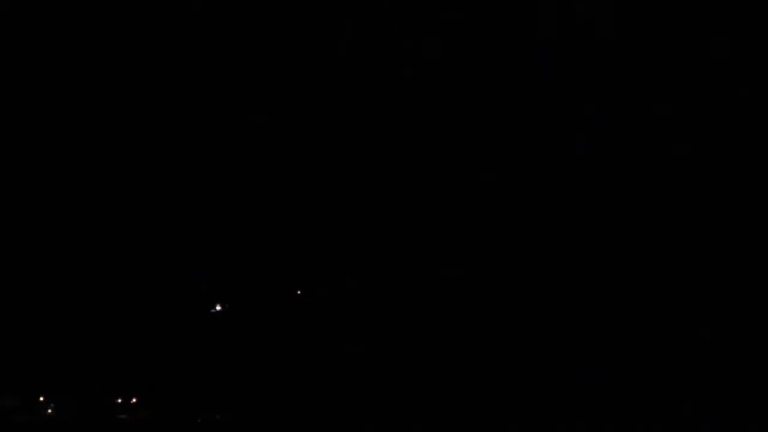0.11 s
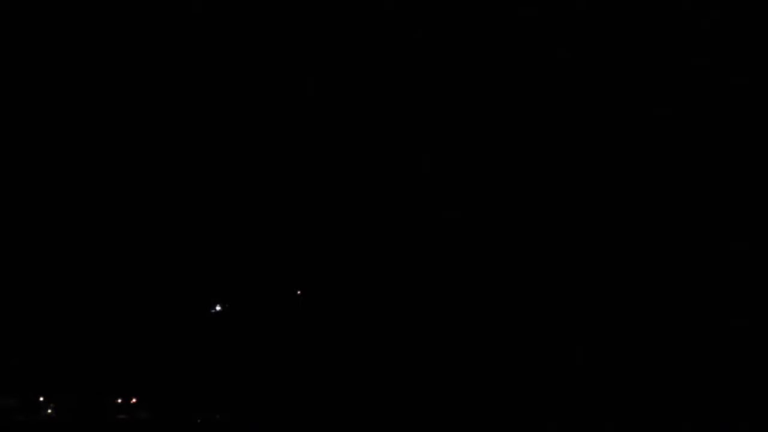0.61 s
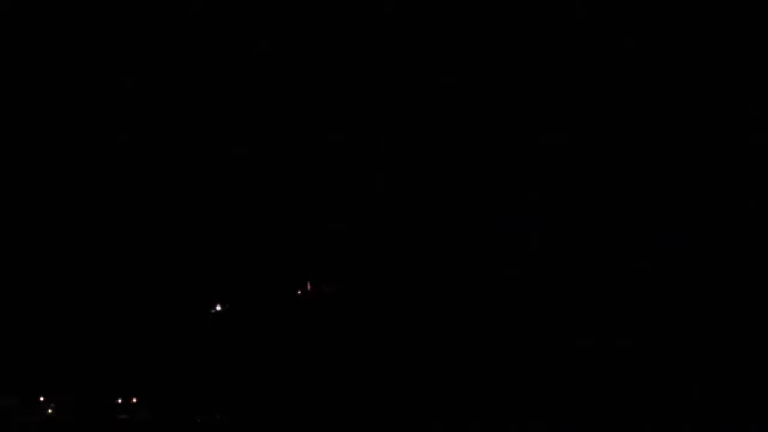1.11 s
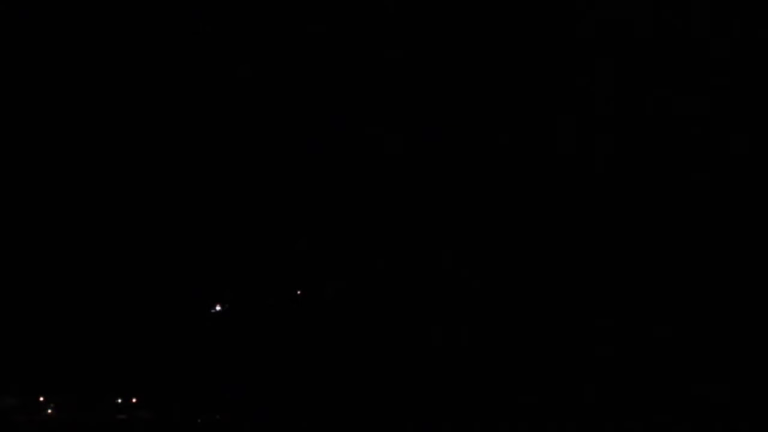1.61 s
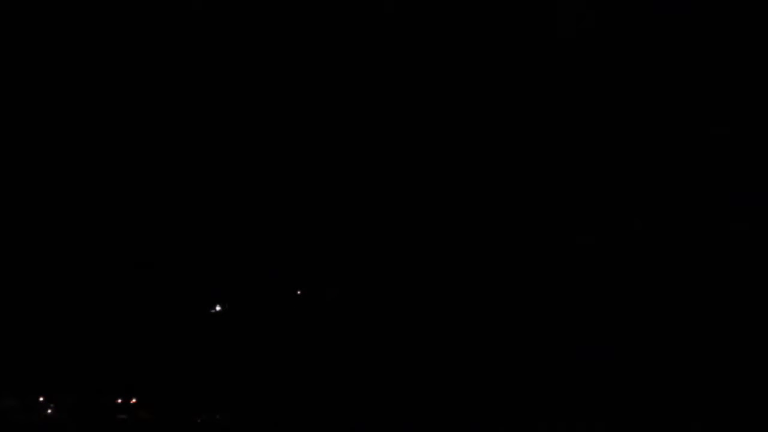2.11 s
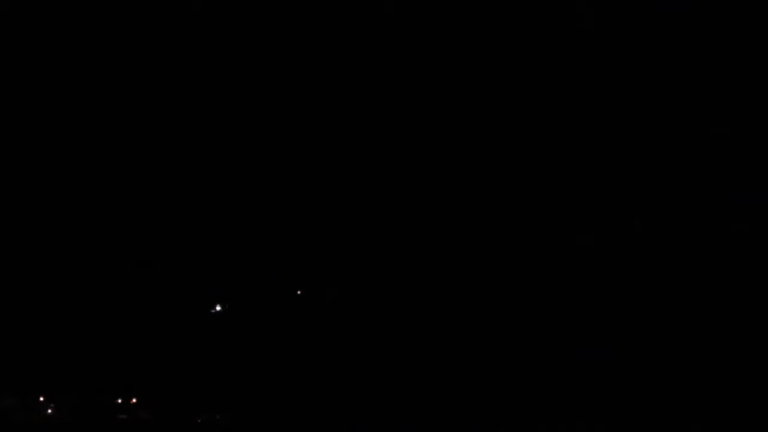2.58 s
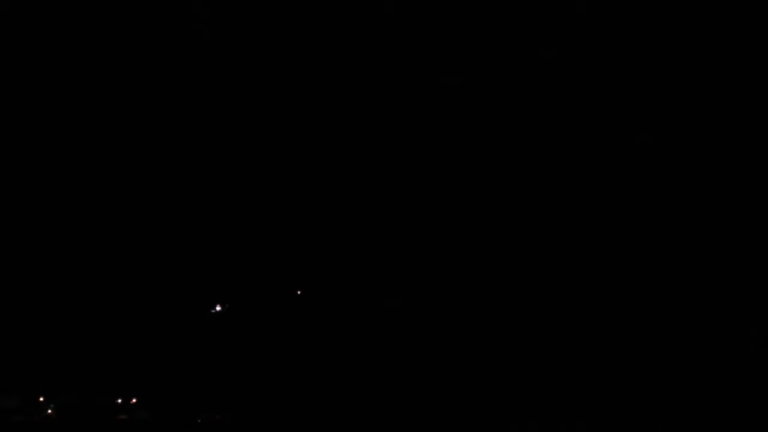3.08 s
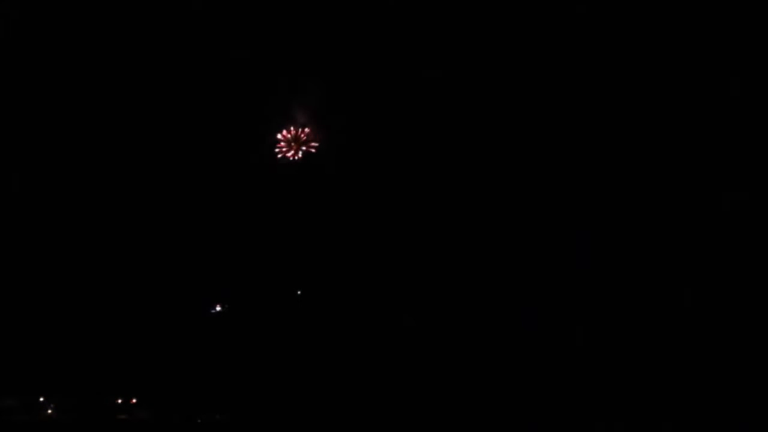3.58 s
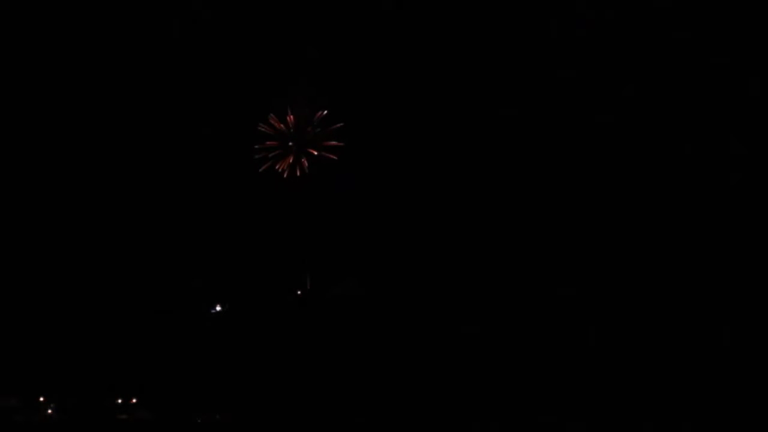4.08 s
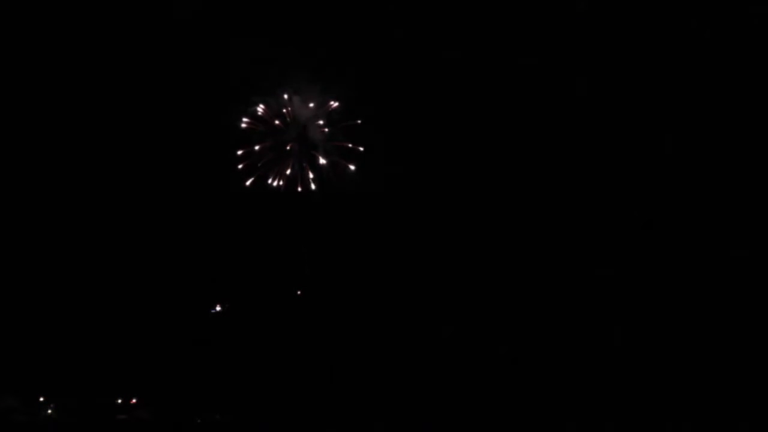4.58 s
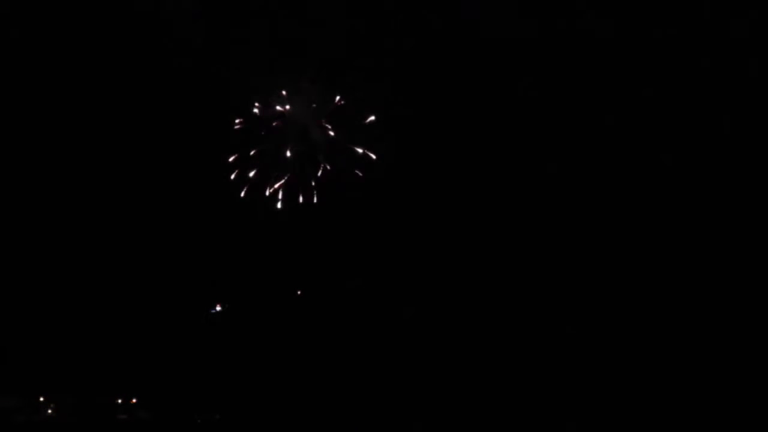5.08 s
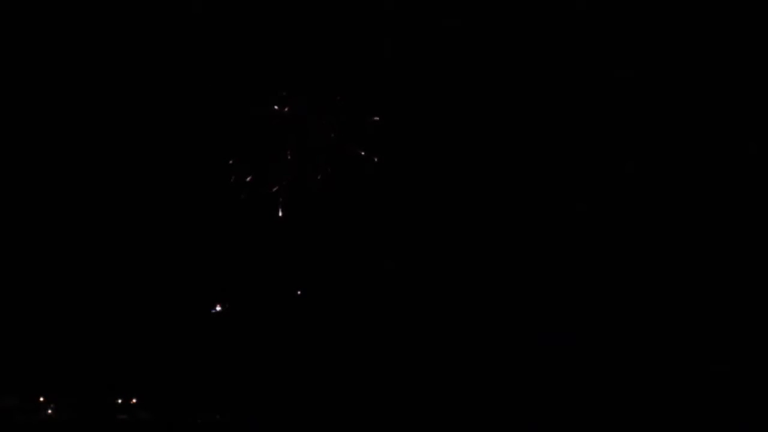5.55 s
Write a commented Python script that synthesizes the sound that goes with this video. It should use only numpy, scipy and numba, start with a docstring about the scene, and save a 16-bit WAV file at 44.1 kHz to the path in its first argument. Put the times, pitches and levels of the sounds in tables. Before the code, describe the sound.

Outdoors at night, a dull weaker firework thud comes first, then a loud, bassy bang with slapping house echoes and a rolling tail. A launch tube thumps and roars briefly, and another heavy bang follows. Afterwards only distant traffic rumble, faint insect ticks and hiss remain. A camcorder microphone overloads on the bangs and its level dips, then creeps back.

```python
"""Distant fireworks at night

Damped shocks from far shells return from the same house fronts and ribbed wall, then roll over the land as noise.
A mortar roars and thumps between them; dull thuds, rustles and insect ticks lie over filtered-noise traffic.
A camcorder adds hiss and whine, ducks its gain, lets it creep back and clips what still exceeds full scale."""
import sys
import numpy as np
from scipy import signal
from scipy.fft import rfft, irfft, next_fast_len
from scipy.io import wavfile
from scipy.ndimage import uniform_filter1d
from numba import njit

SR = 44100
rng = np.random.default_rng(int(sys.argv[2]) if len(sys.argv) > 2 else 0)


def generate_wav(sig):
    """Save sig (samples, or channels by samples) to the path in sys.argv[1] as 16-bit PCM at SR."""
    pcm = np.round(np.clip(np.atleast_2d(sig).T, -1, 1) * 32767).astype(np.int16)
    wavfile.write(sys.argv[1], SR, pcm)


def magnitude_from_level(level_db):
    """Linear magnitude for a level in decibels (20 dB per decade)."""
    exponent = np.asarray(level_db, float) / 20
    return 10 ** exponent


N = 250786
T = np.arange(N) / SR  # [s]
GROUND_HZ, GROUND_T60_S = 556, 0.02  # ripple of the ground bounce

# echoes off house fronts: (delay [s], level [dB], pitch [multiple of the rebound frequency])
HOUSE_FRONTS = [(0.0922, -12, 1.6), (0.1278, -2, 1.45), (0.149, -16, 1.3), (0.166, -16.5, 1.3),
                (0.182, -13.5, 1.6), (0.2202, -11.5, 1.8), (0.228, -17.5, 2.2), (0.264, -20, 1.4),
                (0.274, -18.5, 1.8)]


def band(x, hz, width):
    """A two-pole resonance passes its centre frequency at gain 1."""
    return signal.lfilter(*signal.iirpeak(hz, hz / width, fs=SR), x)


def cut(x, hz, kind, order=2):
    """A Butterworth low-pass or high-pass attenuates one side of its corner frequency."""
    return signal.sosfilt(signal.butter(order, hz, kind, fs=SR, output="sos"), x)


def unit(x):
    """Division by the root mean square gives a signal rms 1."""
    return x / np.sqrt(np.mean(x ** 2))


def noise():
    """White noise carries equal power in every hertz."""
    return rng.standard_normal(N)


def coloured(points):
    """Weighting white noise in frequency gives rms-1 noise with a (Hz, relative dB) spectrum."""
    hz, db = np.transpose(points)
    size = next_fast_len(N)
    f = np.arange(size // 2 + 1) * SR / size + 1  # + 1 keeps the logarithm finite
    weight = magnitude_from_level(np.interp(np.log(f), np.log(hz), db))
    return unit(irfft(rfft(rng.standard_normal(size)) * weight, size)[:N])


def walk(rate):
    """Random levels held for 1 / rate seconds and smoothed twice fluctuate with a spread near 1."""
    k = int(SR / rate)
    held = np.repeat(rng.standard_normal(N // k + 1), k)
    return 1.3 * uniform_filter1d(uniform_filter1d(held, k), k)[:N]


def ring(t, hz, t60, lead=0.):
    """A damped oscillation starts at t = 0 with phase lead [rad] and loses 60 dB in t60 [s]."""
    u = np.maximum(t, 0)
    return (t >= 0) * np.exp(-np.log(1000) * u / t60) * np.cos(2 * np.pi * hz * u + lead)


def shock(t, rebound_hz, air_hz):
    """A pressure jump rebounds as damped oscillation with a ground ripple; air absorption rounds it."""
    push = ring(t, rebound_hz, 0.056, lead=.3)
    push += magnitude_from_level(-4.5) * ring(t, GROUND_HZ, GROUND_T60_S, lead=-.8)
    push += magnitude_from_level(-14) * ring(t, 78, 0.12, lead=np.pi / 2)  # slow swing of the air behind the shock
    return signal.sosfilt(signal.bessel(4, air_hz, fs=SR, norm="mag", output="sos"), push / 1.54)


def front(t, hz):
    """A broad reflector smears the shock into a dull swing (crest, deep trough, crest) with ground ripple."""
    turn = np.maximum(t * hz, 0)  # cycles since arrival
    swing = np.exp(-((turn - .75) / .75) ** 2) * np.sin(2 * np.pi * turn)
    return swing + magnitude_from_level(-11) * ring(t, GROUND_HZ, GROUND_T60_S, lead=-np.pi / 2)


def house_fronts(s, rebound_hz, air_hz):
    """Specular reflection: each house front returns the shock after its own path delay."""
    echoes = sum(magnitude_from_level(db) * front(T - s - lag, pitch * rebound_hz) for lag, db, pitch in HOUSE_FRONTS)
    return cut(echoes, air_hz, "low", order=3)


def scatter(s):
    """Diffuse reflection: rough surfaces break every arrival into a decaying burst of noise."""
    t60_s, rise_s = 0.092, .001
    near = (0.0019, 1.5, 0)  # ground and hedges just behind the shock
    fading = sum(magnitude_from_level(db) * ring(T - s - lag, 0, t60_s) for lag, db, _ in [near] + HOUSE_FRONTS)
    fading = uniform_filter1d(fading, int(2 * rise_s * SR))
    rough = magnitude_from_level(-22 + walk(200)) * unit(band(noise(), 630, 460))
    return cut(fading * rough, 1700, "low", order=3)


def ribbed_wall():
    """Repetition pitch: faint echoes off successive ribs merge into a falling chirp, uneven and patchy."""
    first_s, last_s, edge_s = .149, .292, 0.0043
    first_hz, far_hz, settle_s, sag_hz_per_s = 2750, 1830, .025, 1600
    u = np.maximum(T - first_s, 0)
    # the echo rate drops fast along the near ribs, then sags
    drop = (first_hz - far_hz) * np.exp(-(u / settle_s) ** 2)
    hz = np.maximum(far_hz - sag_hz_per_s * u, 0) + drop
    uneven = 1 + (.03 + .14 * drop / first_hz) * walk(500)
    patchy_db = 3.5 * walk(160)  # some ribs are hidden
    phase = 2 * np.pi * np.cumsum(hz * uneven) / SR
    inside = np.clip(np.minimum(u, last_s - T) / edge_s, 0, 1)
    # far ribs face the sound better: 35 dB/s
    db = -31.5 + 35 * np.minimum(u, last_s) + patchy_db
    return inside * magnitude_from_level(db) * (np.sin(phase) + .25 * np.sin(2 * phase))


def land_roll(s):
    """Reverberation: overlapping distant echoes act as noise bands that swell and decay exponentially."""
    # noise bands: (centre [Hz], width [Hz], level [dB], rise [s], 60 dB decay [s])
    roll_bands = [(109.6, 75, -20, 0.14, 1.86), (236, 100, -18, 0.07, 1.02), (560, 210, -33.5, 0.033, 1.96)]
    out, u = np.zeros(N), np.maximum(T - s, 0)
    for hz, width, db, rise, t60 in roll_bands:
        swell = (1 - np.exp(-u / rise)) ** 2 * magnitude_from_level(-60 * u / t60 + db + 0.66 * walk(25.27))
        out += swell * unit(cut(band(noise(), hz, width), 2 * hz, "low"))
    return out


def bursts():
    """Superposition: each shell's direct shock adds to its reflections, scatter and reverberation."""
    # shells: (time [s], level [dB], rebound [Hz], air cut-off [Hz], echoes relative to the shock [dB])
    shells = [(.1120, -11.5, 110, 700, -1.5), (0.7952, 10.5, 122.3, 840, -5.5), (2.422, 8.5, 175, 754, -4)]
    out = np.zeros(N)
    for s, db, rebound_hz, air_hz, echo_db in shells:
        late = house_fronts(s, rebound_hz, air_hz) + scatter(s) + land_roll(s)
        start = int(s * SR)
        late[start:] += cut(ribbed_wall(), air_hz, "low")[:N - start]
        out += magnitude_from_level(db) * (shock(T - s, rebound_hz, air_hz) + magnitude_from_level(echo_db) * late)
    return out


def mortar():
    """Jet turbulence roars out of the tube, its treble dying first, over damped low oscillations."""
    # roar spectrum: (frequency [Hz], relative density [dB per Hz])
    roar_spectrum = [(35, -24), (60, -7.5), (236, -11), (332, -21), (417, -17), (512, -18.5), (721, -23.5),
                     (1530, -30.5), (1680, -24), (3400, -37.5), (5200, -55.5), (11000, -62.5), (14000, -74)]
    # thumps of the launch and a later echo: (time [s], frequency [Hz], level [dB], 60 dB decay [s])
    thumps = [(1.72, 54, -2, 0.42), (1.7234, 105.6, 2, 0.17), (1.768, 144.2, -6, 0.22)]
    u = T - 1.715  # time from full blast [s]
    # for the low part: climb [dB/s], hold [s], fade [dB/s]
    rise, hold_s, fade = 897, 0.0037, 165
    db = np.minimum(np.minimum(rise * u, fade * (hold_s - u)), 0)
    dull = 1.3  # each higher part changes this much faster in dB
    crackle_db = 2.5 * walk(300)
    roar = cut(coloured(roar_spectrum), 91.6, "high") * magnitude_from_level(-5.5 + crackle_db)
    low, mid = cut(roar, 920, "low"), cut(roar, 2200, "low")
    blast = magnitude_from_level(db) * low + magnitude_from_level(dull * db) * (mid - low) + magnitude_from_level(dull ** 2 * db) * (roar - mid)
    thump = sum(magnitude_from_level(d) * cut(ring(T - s, hz, t60, lead=np.pi / 2), 4 * hz, "low")
                for s, hz, d, t60 in thumps)
    return blast + thump


def far_thuds():
    """Damped oscillations lose their sharp onset in a low-pass, as distant thuds do."""
    # thuds: (time [s], level [dB], frequency [Hz])
    thuds = [(0.13, -12, 100), (1.191, -12, 116), (1.258, -13, 95), (1.396, -15.5, 194),
             (1.482, -16.5, 212), (1.517, -14, 164), (1.552, -16, 219), (2.885, -21.5, 224),
             (3.067, -26, 152)]
    return sum(magnitude_from_level(db) * cut(ring(T - s, hz, 0.059, lead=-np.pi / 2), 3 * hz, "low") for s, db, hz in thuds)


def rustles():
    """Friction noise: band-limited noise rises and falls exponentially in brief rustles nearby."""
    # rustles: (time [s], level [dB], centre [Hz], fall time constant [s])
    brushes = [(0.204, -45, 2760, 0.11), (.262, -54, 6000, .02), (0.287, -47.5, 3630, 0.01),
               (.382, -41.5, 3080, 0.013), (.71, -53, 4000, 0.007), (1.168, -53, 5000, .006),
               (1.18, -32, 1250, 0.02), (1.232, -50, 2120, 0.019), (1.292, -47.5, 5200, 0.015)]
    out = np.zeros(N)
    for s, db, hz, fall in brushes:
        width = 0.75 * hz
        shape = np.exp(-np.abs(T - s) / np.where(T < s, 0.0038, fall))
        hush = unit(band(band(noise(), hz, width), hz, width))
        out += shape * magnitude_from_level(db + 2.1 * walk(200)) * hush
    return out


def insect_ticks():
    """An impulsively excited resonance gives each insect tick as a short high damped oscillation."""
    # ticks: (time [s], level [dB])
    ticks = [(0.5736, -43), (1.9131, -44), (2.0936, -46), (3.074, -47), (3.1926, -43), (3.8731, -42),
             (4.193, -41.5), (4.3134, -41), (4.4945, -43), (4.591, -46), (4.627, -47)]
    return sum(magnitude_from_level(db) * ring(T - s, 6250, 0.0059, lead=-np.pi / 2) for s, db in ticks)


def traffic():
    """Incoherent sources add as noise: deep boom, uneven rumble with an engine drone, smoother tyre roar."""
    # rumble spectrum: (frequency [Hz], relative level [dB])
    rumble_spectrum = [(30, -40), (55, -2), (90, -2), (150, -6), (220, -4), (300, -11.5), (400, -16),
                       (600, -36), (900, -120)]
    # tyre spectrum: (frequency [Hz], relative level [dB])
    tyre_spectrum = [(180, -4.5), (300, -5), (453, 2.5), (607, 3), (926, 1), (1650, -6.5), (1900, -13),
                     (4000, -27.5), (5200, -41), (8800, -120)]
    deep = unit(cut(band(noise(), 46.4, 90), 2 * 46.4, "low"))
    drone = magnitude_from_level(-8 + 0.99 * walk(3.11)) * unit(band(noise(), 146, 6))
    rumble = coloured(rumble_spectrum) * magnitude_from_level(1.5 * walk(14)) + drone
    tyres = coloured(tyre_spectrum) * magnitude_from_level(.8 * walk(6))
    return magnitude_from_level(-43) * deep + magnitude_from_level(-34.5) * rumble + magnitude_from_level(-39) * tyres


def scene():
    """Linear superposition: the pressures of all sources add at one microphone."""
    return (bursts() + mortar() + far_thuds() + rustles() + insect_ticks() + traffic())[None]


def preamp_hiss():
    """Electronic noise: a stationary random signal with a shaped spectrum."""
    # hiss spectrum: (frequency [Hz], relative level [dB])
    hiss_spectrum = [(1470, -73), (2500, -37), (4420, -5), (9420, -9.5), (14600, -18), (15000, -11)]
    return magnitude_from_level(-61.5) * coloured(hiss_spectrum)


def line_whine():
    """Amplitude modulation: a slow sine makes a steady high tone throb."""
    throb = 1 + .6 * np.sin(2 * np.pi * 13.55 * T)
    return magnitude_from_level(-65) * throb * np.sin(2 * np.pi * 15734 * T)


@njit
def duck(over_db, attack, release, charge, drain_db):
    """Feed-forward gain cut [dB]: quick to bite, it falls back to a slow store that overloads fill."""
    out, quick, slow = np.empty(len(over_db)), 0., 0.
    for i in range(len(over_db)):
        if over_db[i] > quick:
            quick += attack * (over_db[i] - quick)
        else:
            quick += release * (slow - quick)
        slow = max(slow + charge * (quick - slow) - drain_db, 0.)  # drains evenly
        out[i] = quick
    return out


def gain_control(x):
    """Automatic gain control: the level above a limit sets the gain cut."""
    limit_db, attack_s, release_s, charge_s, drain_db_per_s = -12.5, 0.0014, 0.42, 0.74, 3.6
    # the level sensor hears little bass, so cracks duck the gain more than booms
    sensed = np.abs(cut(x[0], 269, "high"))
    over_db = 20 * np.log10(sensed + 1e-9) - limit_db
    steps = (1 / (s * SR) for s in (attack_s, release_s, charge_s))
    return x * magnitude_from_level(-duck(over_db, *steps, drain_db_per_s / SR))


def band_limit(x):
    """A steep low-pass at the top of the band."""
    return signal.sosfilt(signal.butter(12, 16480, fs=SR, output="sos"), x)


def record(dry):
    """Signal chain: additive hiss and whine, gain control, hard clipping, then a steep top cut."""
    x = dry + preamp_hiss() + line_whine()
    x = np.clip(gain_control(x), -1, 1)
    mix = signal.sosfilt(signal.ellip(10, .3, 60, 15780, fs=SR, output="sos"), x)
    return band_limit(mix)


dry = scene()
out = record(dry)
generate_wav(out)
```